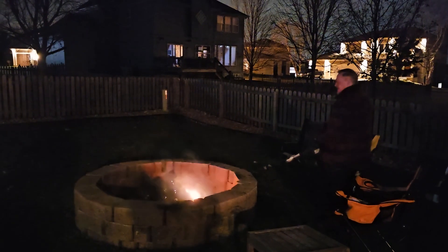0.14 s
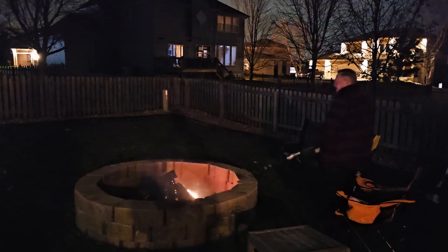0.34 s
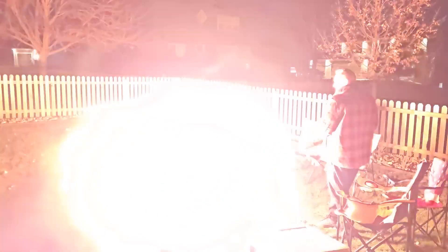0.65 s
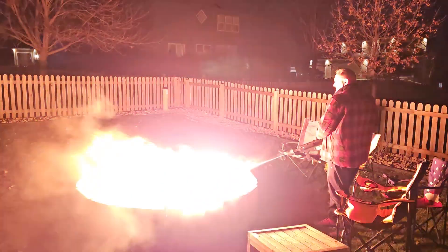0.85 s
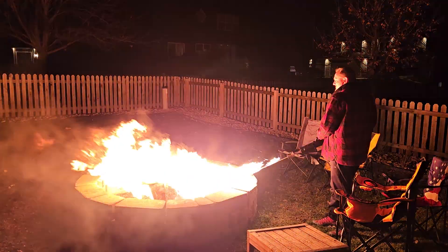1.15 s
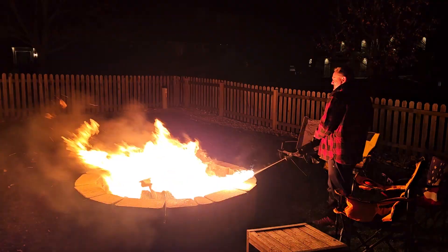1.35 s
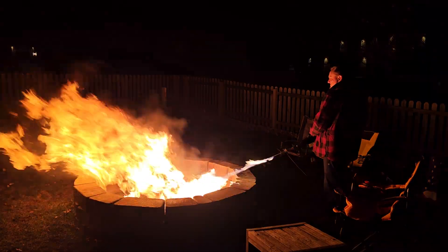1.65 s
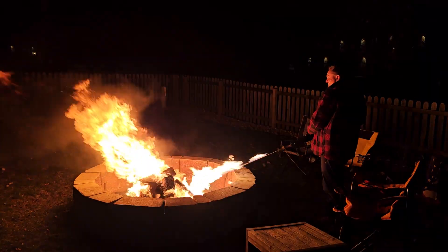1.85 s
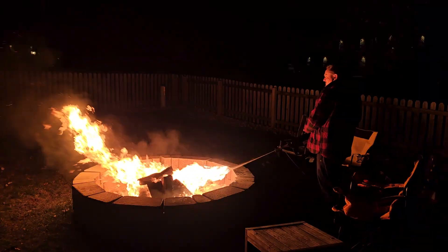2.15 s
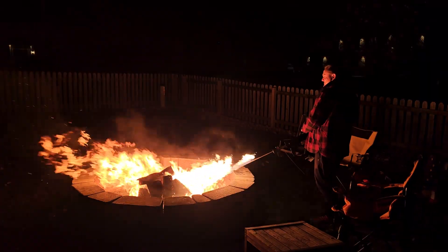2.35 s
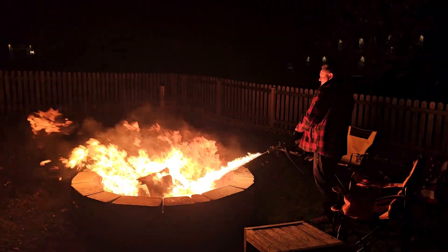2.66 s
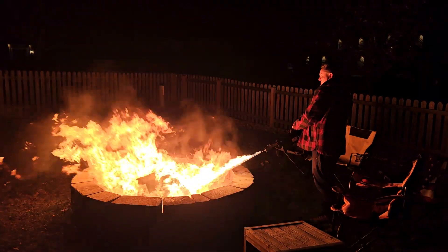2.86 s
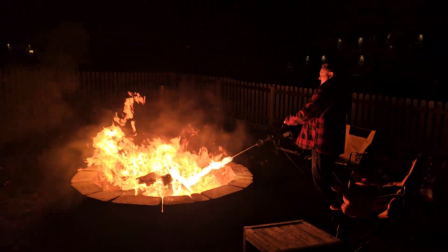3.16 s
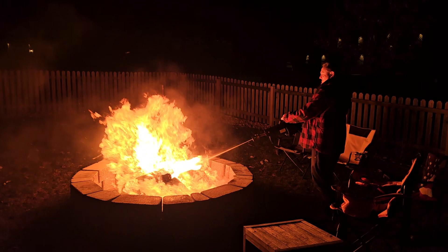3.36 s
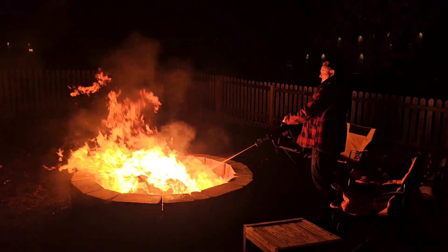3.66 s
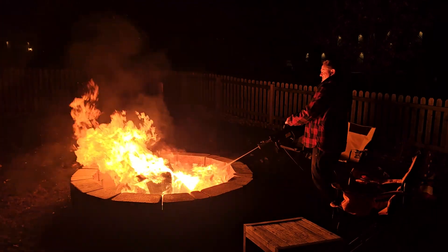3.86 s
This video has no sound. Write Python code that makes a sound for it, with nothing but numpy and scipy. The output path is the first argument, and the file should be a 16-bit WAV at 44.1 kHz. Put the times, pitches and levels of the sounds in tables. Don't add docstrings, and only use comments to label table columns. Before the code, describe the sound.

A fuel torch fires into a brick fire pit outdoors. Faint traffic murmur and hum, with light cloth rustles and a soft bump near 0.3-0.4 s. At 0.5 s the pump kicks in with steady bright hiss, metallic ringing and whine; rapid sparks snap about nineteen times per second from 0.56 s. Flames ignite near 0.6 s, roaring unevenly with deep puffs, strongest around 0.7, 1.8, 2.7 and 3.7 s, continuing to 4 s.

```python
import sys
import numpy as np
from scipy import signal
from scipy.fft import rfft, irfft
from scipy.io import wavfile
from scipy.ndimage import uniform_filter1d

SR = 44100
rng = np.random.default_rng(int(sys.argv[2]) if len(sys.argv) > 2 else 0)


def unload_audio(sound):
    columns = np.transpose(np.atleast_2d(sound))
    steps = np.round(np.clip(columns, -1, 1) * 32767)
    wavfile.write(sys.argv[1], SR, steps.astype(np.int16))


def magnitude_from_level(level_db):
    exponent = np.asarray(level_db, float) / 20
    return 10 ** exponent


N = 176400
T = np.arange(N) / SR
FREQ_HZ = np.fft.rfftfreq(N, 1 / SR)


def curve(rows, axis=1):
    return np.interp(T, [r[0] for r in rows], [r[axis] for r in rows])


def unit(x):
    return x / np.sqrt(np.mean(x ** 2))


def colour(x, tone, centre_hz=0, octaves=0.45):
    octave = np.log2(np.maximum(FREQ_HZ, 1))
    gain = magnitude_from_level(np.interp(octave, np.log2([p[0] for p in tone]), [p[1] for p in tone], left=-70))
    if centre_hz:
        offset = (octave - np.log2(centre_hz)) / octaves
        gain = gain * np.cos(np.pi / 2 * np.clip(offset, -1, 1))
    return irfft(rfft(x) * gain, N)


def late(x, delay_s):
    return irfft(rfft(x) * np.exp(-2j * np.pi * FREQ_HZ * delay_s), N)


def walk(rate_hz):
    hold = int(SR / rate_hz)
    steps = np.repeat(rng.standard_normal(N // hold + 1), hold)
    return 1.198 * uniform_filter1d(uniform_filter1d(steps, hold), hold)[:N]


def ring(x, hz, width_hz):
    r = np.exp(-np.pi * width_hz / SR)
    return signal.lfilter([1 - r], [1, -2 * r * np.cos(2 * np.pi * hz / SR), r * r], x)


# (frequency [Hz], left port lead [rad], left minus right [dB])
PORT_PAIR = [(0, .17, .3), (500, .45, .9), (1300, .8, 3), (2580, .4, -1.5), (3530, 3.4, .3),
             (5080, 3.3, .3), (6630, 8.2, .7), (16200, 19.0, 1.1)]


def ports(x):
    hz, lead_rad, diff_db = np.array(PORT_PAIR).T
    level = magnitude_from_level(np.interp(FREQ_HZ, hz, diff_db) / 2)
    tilt = level * np.exp(.5j * np.interp(FREQ_HZ, hz, lead_rad))
    return irfft(rfft(x) * np.array([tilt, 1 / tilt]), N)


def turbulence(tone, gust_db, gust_hz, flicker_db, apart_low, apart_hz):
    near, wide = 0, 0
    gust = gust_db * walk(gust_hz)
    for hz in 22 * 2 ** np.arange(0, 10, .5):
        if tone[0][0] / 1.5 < hz < tone[-1][0] * 1.5:
            level_db = gust + flicker_db * walk(min(hz / 6, 25))
            band = colour(rng.standard_normal((3, N)), tone, hz) * magnitude_from_level(level_db)
            apart = np.clip(apart_low + hz / apart_hz, 0, 1)
            near = near + np.sqrt(1 - apart) * band[0]
            wide = wide + np.sqrt(apart) * band[1:]
    return unit(ports(near) + wide)


# (frequency [Hz], level [dB])
TRAFFIC_TONE = [(20, -21), (45, 1), (100, -13), (160, -23.5), (300, -36), (700, -40.5), (7500, -54.5),
                (10500, -60)]


def night():
    far = turbulence(TRAFFIC_TONE, 2.9, 3.7, 2.0, 0.15, 4100) * magnitude_from_level(-49)
    hum = np.sqrt(2) * magnitude_from_level(-52 + 1.3 * walk(13)) * np.sin(2 * np.pi * 118.2 * T)
    return far + hum


# (frequency [Hz], level [dB])
FRICTION_TONE = [(400, -14), (650, -7), (1500, -15), (2500, -21), (3500, -10), (5500, -13), (7200, -6),
                 (15000, -16)]
# (start [s], length [s], level [dB])
STROKES = [
    (.105, .04, -67),
    (.333, .024, -57),
    (.36, .012, -53),
    (.374, .022, -55),
    (.4145, .001, -61),
]


def cloth():
    attack_s, t60_s = 0.0028, 0.12
    brush = 0
    for start_s, length_s, db in STROKES:
        decay_db = -60 * np.maximum(T - start_s - length_s, 0) / t60_s
        brush = brush + magnitude_from_level(db + decay_db) * np.clip((T - start_s) / attack_s, 0, 1)
    rustle = turbulence(FRICTION_TONE, 4.4, 300, 7.5, 1.0, 15000) * brush
    bump_s, bump_hz, bump_db, bump_t60_s = .3865, 300, -34.5, 0.0205
    u = np.maximum(T - bump_s, 0)
    return rustle + magnitude_from_level(bump_db - 60 * u / bump_t60_s) * np.sin(2 * np.pi * bump_hz * u)


# (time [s], level [dB])
PUMP_LEVEL = [
    (.5, -53),
    (.512, -14),
    (.55, -8.5),
    (.62, -0.5),
    (2, 0.5),
    (4, -0.5),
]
# (frequency [Hz], level [dB])
NOZZLE_TONE = [(700, -29), (1200, -14), (2000, -33), (3200, -4), (5960, -9), (8000, -8.5), (10500, -11),
               (15600, -8.5)]
# (frequency [Hz], width [Hz], level [dB])
CASING_MODES = [(1200, 350, -60), (1730, 240, -59), (2580, 320, -49), (4500, 400, -55), (11600, 1100, -55)]
# (time [s], shaft rate [Hz], strain on casing and tones [dB])
MOTOR_RUN = [(.5, 415, -16), (.545, 427, 1.5), (.6, 427, 0), (.7, 436, 0.5), (2.6, 435, -0.5),
             (3, 433.5, 0.5), (4, 433.3, -5)]
# (multiple of shaft rate [-], level [dB])
SHAFT_TONES = [(3, -66), (4, -62), (5, -67), (6, -58), (7, -70), (8, -69), (12, -71), (27, -68)]
# (time [s], frequency [Hz], level [dB])
GEAR_WHINE = [(.5, 2480, -60), (.55, 2530, -47), (.6, 2532, -50), (.7, 2534, -58), (2.7, 2530, -58),
              (2.85, 2432, -55), (3.2, 2430, -51), (4, 2428, -50)]


def pump():
    hiss = turbulence(NOZZLE_TONE, 1.1, 16, 1.18, 0.72, 20000) * magnitude_from_level(-43 + curve(PUMP_LEVEL))
    body = 0
    for hz, width_hz, db in CASING_MODES:
        mode = ring(ring(rng.standard_normal(N), hz, width_hz), hz, width_hz)
        body = body + magnitude_from_level(db + 1.2 * walk(29.76)) * unit(mode)
    shaft_rad = 2 * np.pi * np.cumsum(curve(MOTOR_RUN) * (1 + 0.001277 * walk(10))) / SR
    for multiple, db in SHAFT_TONES:
        body = body + np.sqrt(2) * magnitude_from_level(db + 3.2 * walk(4.8)) * np.sin(multiple * shaft_rad)
    whine_rad = 2 * np.pi * np.cumsum(curve(GEAR_WHINE) * (1 + 0.00121 * walk(17))) / SR
    whine = np.sqrt(2) * magnitude_from_level(curve(GEAR_WHINE, axis=2) + 0.95 * walk(23)) * np.sin(whine_rad)
    drive = magnitude_from_level(curve(PUMP_LEVEL) / 2) * (T > .5)
    return hiss + ports(drive * (magnitude_from_level(curve(MOTOR_RUN, axis=2)) * body + whine))


# (frequency [Hz], level [dB])
SNAP_TONE = [(900, -16), (2500, -4.5), (4500, -9), (6500, -6.5), (8200, 1.5), (10500, -12.5), (13800, -0.5),
             (16400, -23)]


def sparks():
    first_s, period_s, scatter_db = .5614, .053478, 1.1
    cluster_s, tail_db, tail_t60_s, attack_s = 0.0029, -7, 0.032, 0.00063
    same_share = .45
    u = np.arange(3000) / SR
    tail = magnitude_from_level(tail_db - 60 * (u - cluster_s) / tail_t60_s)
    shape = np.where(u < cluster_s, 1 - 0.5 * u / cluster_s, tail)
    shape = shape * np.clip(u / attack_s, 0, 1)
    usual = rng.standard_normal((3, len(u)))
    train = np.zeros((3, N + len(u)))
    for s in np.arange(first_s, N / SR, period_s):
        fresh = rng.standard_normal((3, len(u)))
        snap = np.sqrt(same_share) * usual + np.sqrt(1 - same_share) * fresh
        i = int(s * SR)
        train[:, i:i + len(u)] += magnitude_from_level(scatter_db * rng.standard_normal()) * shape * snap
    out = 0
    for hz in 700 * 2 ** np.arange(0, 5.5, .5):
        out = out + colour(train[:, :N], SNAP_TONE, hz) * magnitude_from_level(-27 + 1.1 * walk(6.14))
    return ports(out[0]) + magnitude_from_level(4.0) * out[1:]


# (time [s], level [dB])
JET_LEVEL = [(.57, -59.5), (.66, -33), (.84, -32), (1.1, -46), (1.15, -31.5), (1.49, -33.5), (1.64, -32),
             (1.74, -39), (1.79, -30.5), (2.16, -33), (2.35, -37.5), (2.49, -32.5), (2.68, -47),
             (2.78, -33.5), (3.05, -34), (3.4, -35.5), (3.52, -41), (4, -46)]
# (frequency [Hz], level [dB])
JET_TONE = [(110, -7.5), (170, -2), (250, 1), (400, -7), (650, -13.5), (1050, -18), (2800, -28),
            (6500, -37.5)]


def jet():
    echo_s, echo_db = 0.0014, -2.5
    direct = turbulence(JET_TONE, 1.82, 29.49, 1.1, 0.013, 10800)
    echo = colour(late(direct, echo_s), [(5, 0), (650, 0), (1500, -16)])
    return unit(direct + magnitude_from_level(echo_db) * echo) * magnitude_from_level(curve(JET_LEVEL) + 5)


# (time [s], level [dB])
BALL_LEVEL = [(.57, -48), (.61, -27.5), (.7, -17), (.81, -34), (.92, -20), (1.05, -20), (1.3, -29.5),
              (1.55, -22.5), (1.77, -23.5), (2.0, -23), (2.25, -25.5), (2.45, -22), (2.68, -20.5),
              (3.04, -25), (3.2, -27), (3.5, -26.5), (3.75, -23.5), (4, -22.5)]
# (frequency [Hz], level [dB])
BALL_TONE = [(22, -13), (40, -3.5), (65, -1), (87, 2.5), (125, -4.5), (170, -13), (260, -19), (360, -39.5)]
# (time [s], peak level [dB], pitch [Hz])
FUEL_PUFFS = [(.62, -7, 100), (0.711, -1.5, 59.4), (1.01, 0, 80), (1.192, -1.5, 80), (1.629, -3.5, 86),
              (1.8, 5.5, 86), (2.327, -1, 65), (2.677, 2, 87), (2.779, 1, 54.7), (2.972, -6, 70),
              (3.69, 4.5, 80), (3.971, -6, 89)]


def fireball():
    puff_width_s, puff_db = 0.0087, -11
    ball = turbulence(BALL_TONE, 2.07, 6.09, 1.6, .006, 25000) * magnitude_from_level(curve(BALL_LEVEL) + 0.5)
    for s, db, hz in FUEL_PUFFS:
        pulse = np.exp(-((T - s) / puff_width_s) ** 2)
        ball = ball + magnitude_from_level(db + puff_db) * np.cos(2 * np.pi * hz * (T - s)) * pulse
    return ball


def fire():
    lit = np.clip((T - .585) / 0.031, 0, 1)
    return lit * (fireball() + jet())


def cut(x, top_hz):
    return signal.sosfilt(signal.ellip(8, .3, 60, top_hz, fs=SR, output="sos"), x)


def scene():
    return cut(night() + cloth() + pump() + fire(), 15800) + cut(sparks(), 16500)


def band_limit(x):
    return signal.sosfilt(signal.butter(12, 16640, fs=SR, output="sos"), x)


def record(dry):
    mix = np.tanh(1.357 * dry) / 1.247
    return band_limit(mix)


dry = scene()
out = record(dry)
unload_audio(out)
```